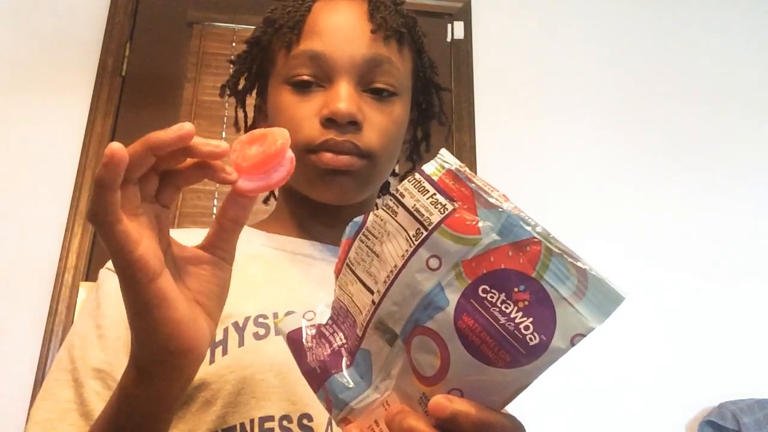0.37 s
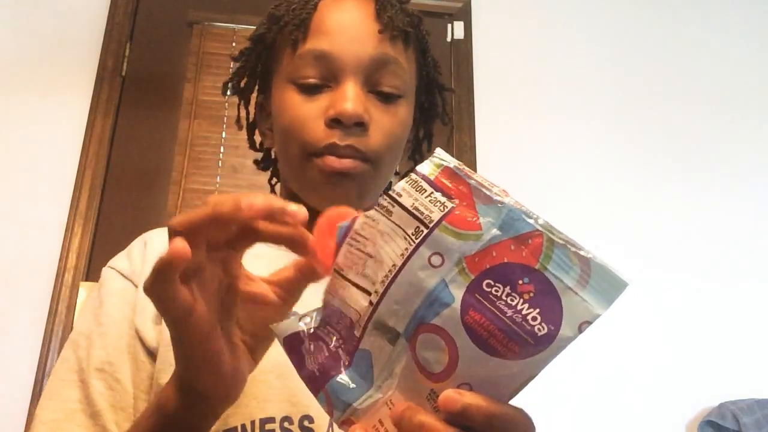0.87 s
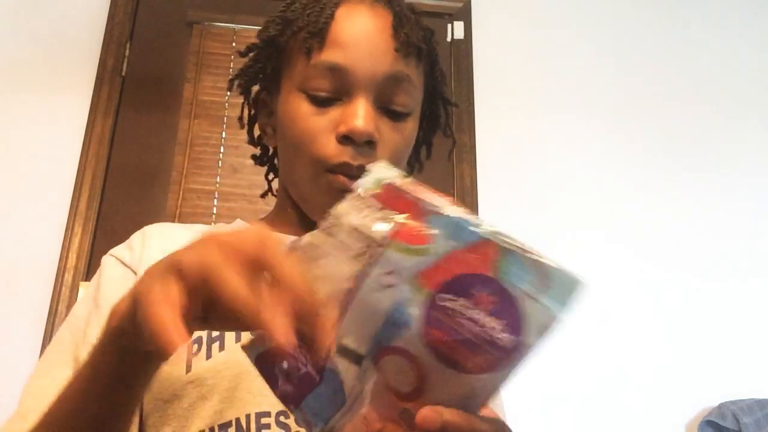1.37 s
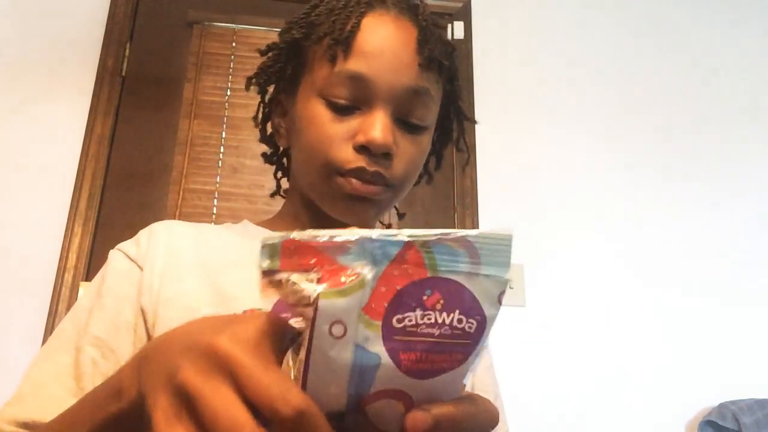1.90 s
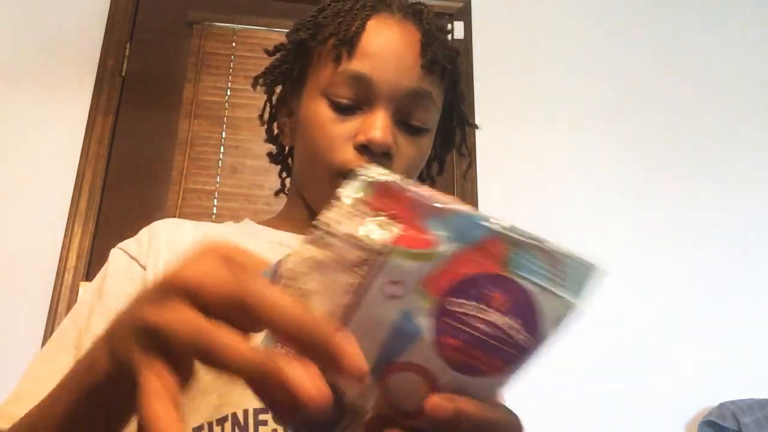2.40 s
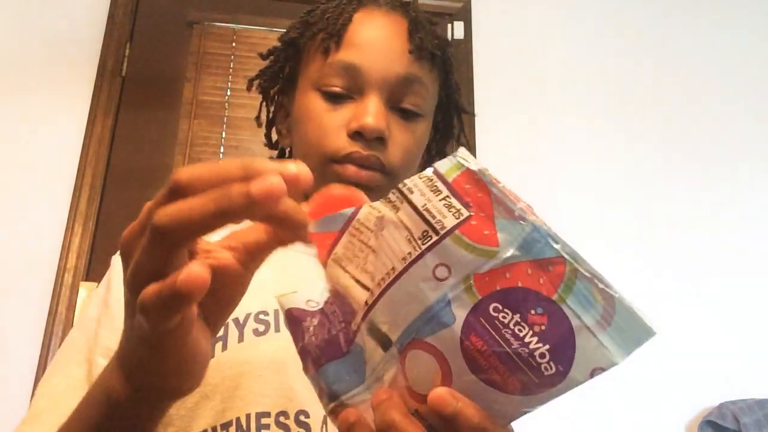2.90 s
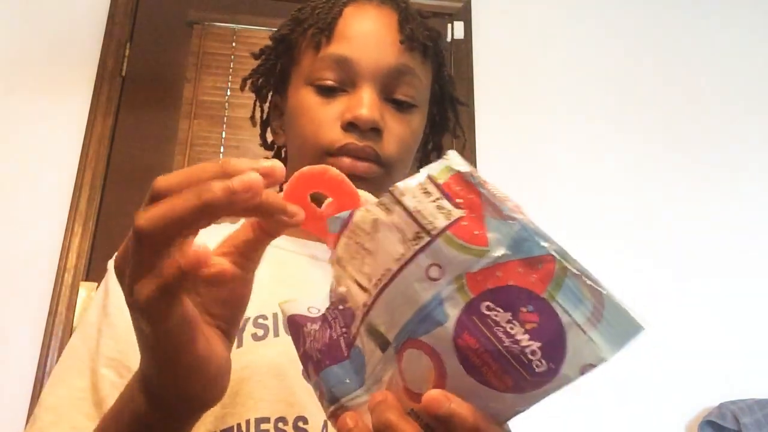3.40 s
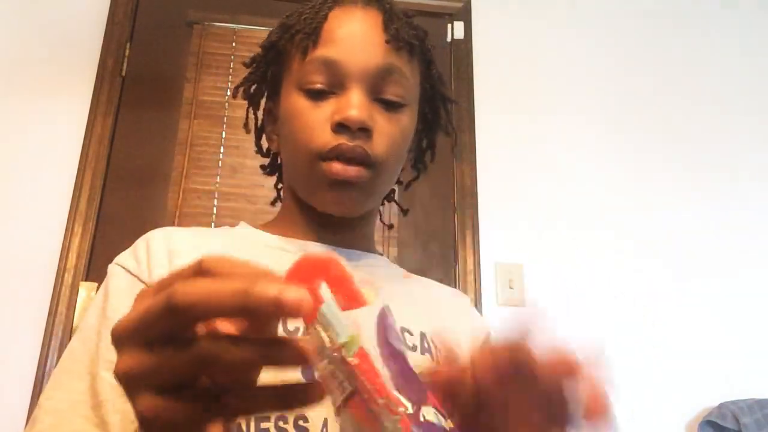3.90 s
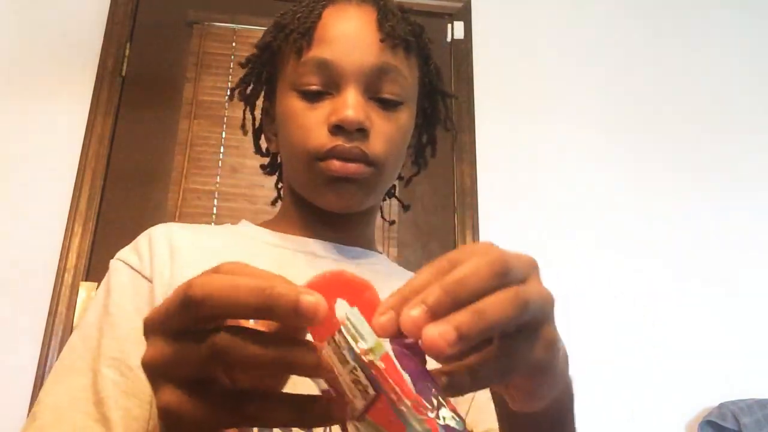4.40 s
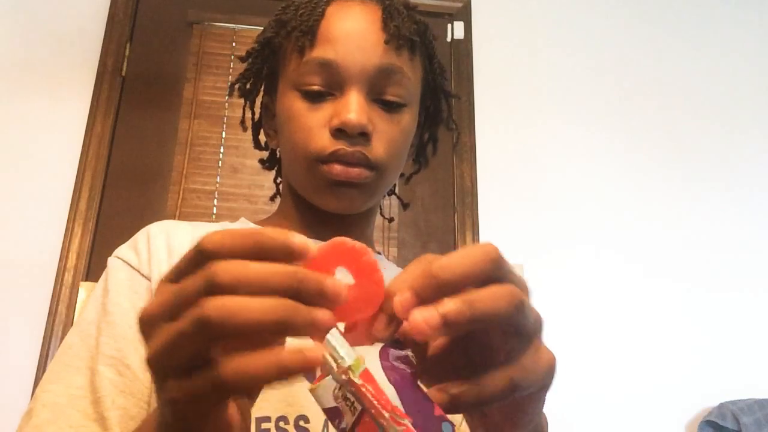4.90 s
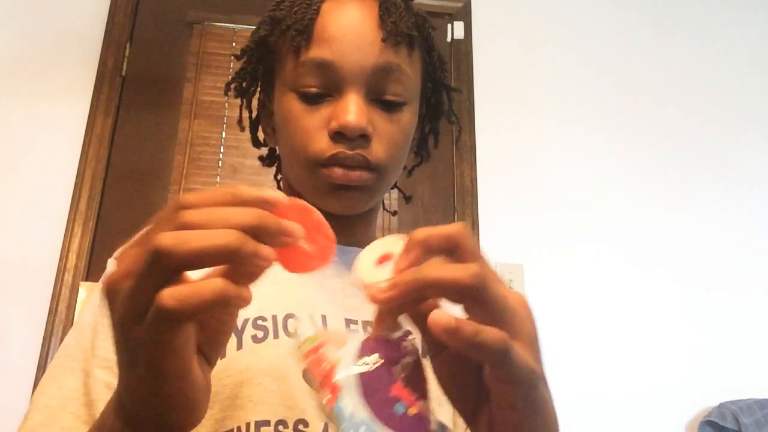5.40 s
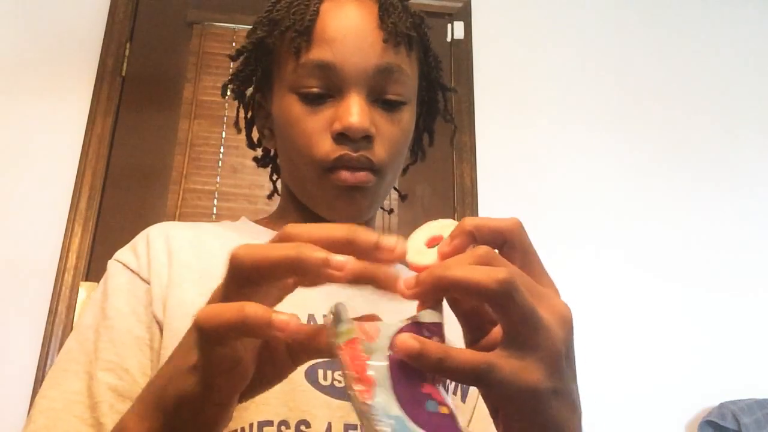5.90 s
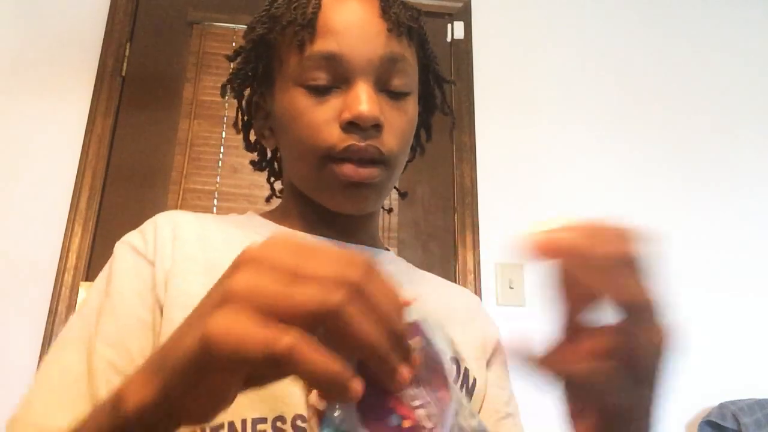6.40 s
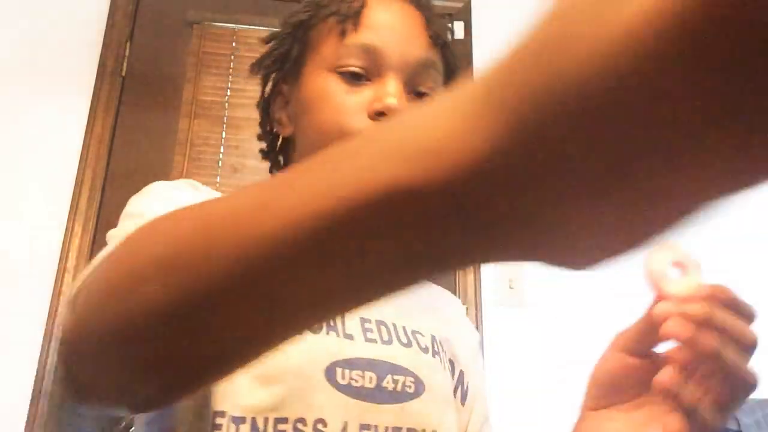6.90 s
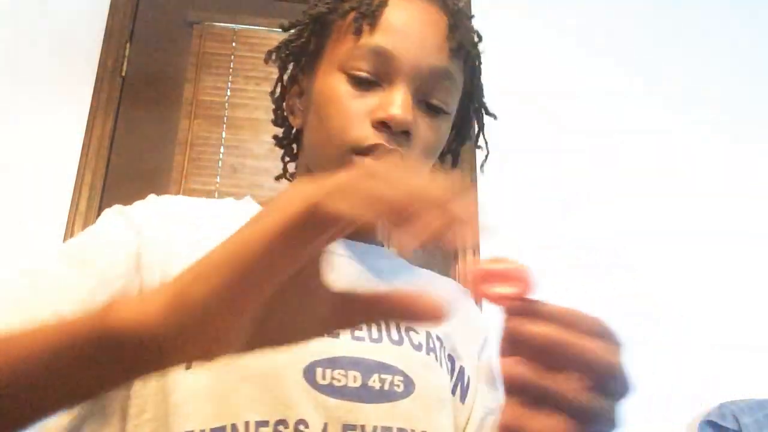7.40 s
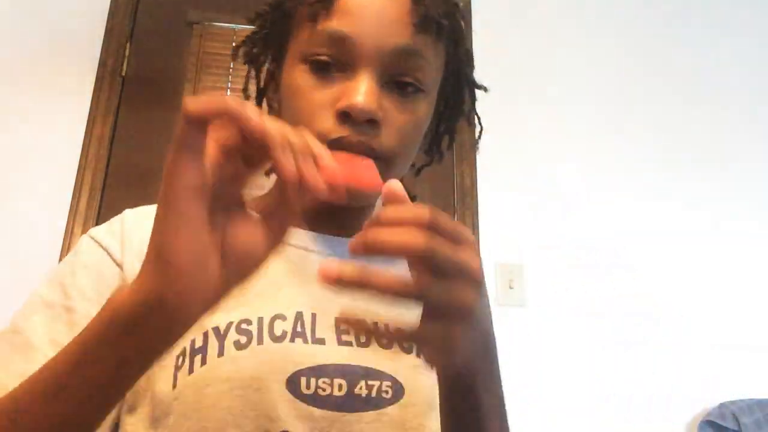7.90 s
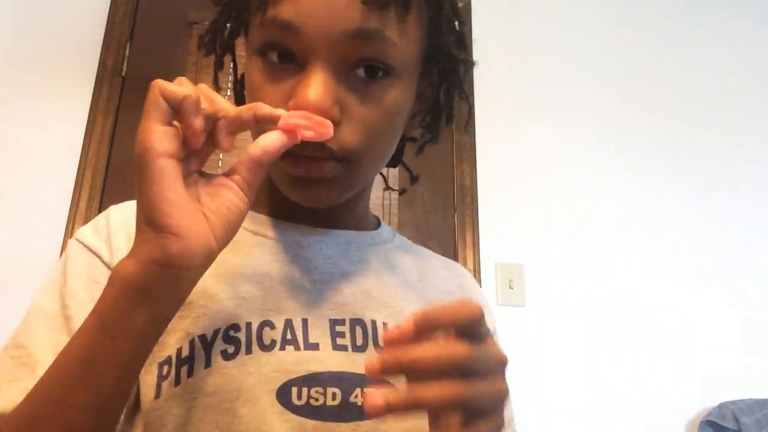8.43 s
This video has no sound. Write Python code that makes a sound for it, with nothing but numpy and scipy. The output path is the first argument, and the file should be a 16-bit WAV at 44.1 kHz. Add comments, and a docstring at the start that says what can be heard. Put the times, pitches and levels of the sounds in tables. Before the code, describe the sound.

Close to the microphone, fingers handle a stiff plastic candy pouch in a small quiet room. A few light ticks lead to dense crackling, a sparse lull, another sharp flurry, then scattered small crinkles. A final strong burst brings low thumps as the pouch is put aside, leaving only faint hum and hiss.

```python
"""A stiff plastic candy pouch is handled close to a microphone in a small quiet room.
Creases buckle with sharp snaps: noise bursts ring a freed facet and the film panels, with a bright tick.
Under them runs a dense crinkle: random clicks and rubbing noise excite the film's resonances.
The pouch's air and the table give low thumps, made of damped sines; echoes and a short tail form the room.
A low hum of resonant noise and a faint hiss of shaped noise fill the pauses."""
import sys
import numpy as np
from scipy import signal
from scipy.fft import rfft, irfft
from scipy.io import wavfile

SR = 44100
rng = np.random.default_rng(int(sys.argv[2]) if len(sys.argv) > 2 else 0)


def volts(x):
    """Linear amplitude factor 10**(x/20) for a level x in dB, scalar or array-like."""
    e = np.asarray(x, float) / 20
    return 10 ** e


def store_wav(level_fs):
    """Save 16-bit WAV to argv[1]."""
    pcm = np.round(np.clip(np.atleast_2d(level_fs), -1, 1) * 32767)
    wavfile.write(sys.argv[1], SR, pcm.T.astype(np.int16))


N = 376746


def rms_one(x):
    """Normalization: scale to an rms of 1."""
    return x / np.sqrt(np.mean(x ** 2) + 1e-20)


def band(x, low_hz, high_hz):
    """Band limiting: a Butterworth band-pass."""
    high_hz = min(high_hz, 0.45 * SR)
    return signal.sosfilt(signal.butter(2, [low_hz, high_hz], "band", fs=SR, output="sos"), x)


def ring(clicks, hz, t60):
    """Damped resonance: a unit click starts a decaying sine of height 1 in a two-pole filter."""
    radius, angle = volts(-60 / (t60 * SR)), 2 * np.pi * hz / SR
    return signal.lfilter([0, np.sin(angle)], [1, -2 * radius * np.cos(angle), radius ** 2], clicks + 1e-18)


def damped(hz, t60, size):
    """Free vibration: a sine starts at once and decays exponentially, by 60 dB in t60 seconds."""
    t = np.arange(size) / SR
    return np.sin(2 * np.pi * hz * t) * volts(-60 * t / t60)


def drift(rate_hz):
    """Slow random fluctuation: noise through a two-pole low-pass, scaled to rms 1."""
    r = np.exp(-2 * np.pi * rate_hz / SR)
    run_in = SR
    slow = signal.lfilter([1], [1, -2 * r, r * r], rng.standard_normal(N + run_in))
    return rms_one(slow[run_in:])


def add(out, start_s, sound):
    """Superposition: mix a short sound in at its start time."""
    i = round(start_s * SR)
    out[i:i + len(sound)] += sound[:N - i]


# spectrum of the hiss, relative level per Hz: pitch_hz, level_db
AIR_SPECTRUM = [(180, -23), (300, -4), (425, -9.5), (554, -9.5), (1170, -18.5), (1290, -21.5),
                (3010, -29.5), (11000, -35.5), (15800, -36.5)]


def air():
    """Stationary noise: a steady hiss, spectrally shaped, strongest in the low range and weak in the treble."""
    hz = np.maximum(np.fft.rfftfreq(N, 1 / SR), 1)
    point_hz, point_db = np.transpose(AIR_SPECTRUM)
    shape_db = np.interp(np.log(hz), np.log(point_hz), point_db)
    hiss = irfft(rfft(rng.standard_normal(N)) * volts(shape_db), N)
    return volts(-65) * rms_one(hiss)


# brief swells of the hum: peak_s, rise above the usual level_db
HUM_SWELLS = [(5.022, 16), (5.64, 6)]


def swelling():
    """Exponential growth and decay: level in dB of the swelling hum resonance, with a run-in of one second."""
    usual_db, rise_s, fall_s = -6.5, 0.03, 0.04  # time constants of each swell
    t = np.arange(N + SR) / SR - 1
    level_db = np.full(len(t), usual_db)
    for peak_s, swell_db in HUM_SWELLS:
        level_db += swell_db * np.exp(np.minimum((t - peak_s) / rise_s, (peak_s - t) / fall_s))
    return level_db


# resonances of the hum: pitch_hz, width_hz, level_db before drift and swelling
HUM_RESONANCES = [(51, 48, -63), (133.6, 47, -48.5), (202, 44, -62), (252.2, 30, -66.5), (319.5, 40, -69)]


def hum():
    """Resonant filtering: noise in a few low bands wavers slowly, and the second band swells."""
    out = np.zeros(N)
    for k, (hz, width_hz, level_db) in enumerate(HUM_RESONANCES):
        drive = rng.standard_normal(N + SR)
        if k == 1:
            drive *= volts(swelling())
        tone = band(drive, hz - width_hz / 2, hz + width_hz / 2)[SR:]
        tone *= np.sqrt(SR / 2 / width_hz)  # make up for the power lost outside the band
        out += volts(level_db + 1.3 * drift(1.6)) * tone
    return out


# reflections from near surfaces: delay_s, level_db
NEAR_ECHOES = [(.0058, -22), (.0115, -20)]
# bands of the diffuse tail: pitch_hz, t60_s, level_db relative to equal energy per Hz
ROOM_BANDS = [(300, .25, -6), (1200, .24, -8), (3500, .23, -8), (9000, .21, -9)]


def room(x):
    """Reverberation: convolution with near echoes and a diffuse tail that decays band by band."""
    t = np.arange(SR // 2) / SR
    answer = np.zeros(len(t))
    for hz, t60, level_db in ROOM_BANDS:
        noise = band(rng.standard_normal(len(t)), hz / 1.9, hz * 1.9)
        tail = noise * volts(-60 * t / t60) * (1 - np.exp(-t / 0.00063))
        equal_energy = np.sqrt(hz / SR / np.sum(tail ** 2))  # the same energy per Hz in every band
        answer += volts(level_db) * tail * equal_energy
    for delay_s, level_db in NEAR_ECHOES:
        answer[round(delay_s * SR)] += volts(level_db)
    return signal.fftconvolve(x, answer)[:N]


# low thumps: start_s, peak_db, pitch_hz, t60_s, deep shove_db relative to the ring
LOW_THUMPS = [(0.968, -40, 121, 0.1, -27), (1.06, -27, 171, 0.025, -7), (1.214, -31.5, 137, 0.047, -11),
              (1.882, -45, 162, 0.066, -24), (2.174, -38, 235, 0.11, -31), (2.395, -35, 115, 0.084, -21),
              (2.43, -25.5, 229, 0.031, -16), (2.589, -37, 140, 0.061, -14), (3.819, -44.5, 237, 0.16, 9),
              (3.932, -41, 137, 0.14, -19), (3.991, -25, 205, 0.056, -33), (6.02, -34.5, 182, 0.044, -26),
              (6.633, -26, 188, 0.023, -33), (6.853, -31, 149, 0.038, -22), (7.107, -20.5, 180, 0.046, -3),
              (7.175, -19.5, 185, 0.047, -7), (7.272, -34, 177, 0.057, -27)]


def thumps():
    """Damped low modes: squeezed air and the table answer with a soft ring and a deeper shove."""
    out, t = np.zeros(N), np.arange(SR // 3) / SR
    for start_s, peak_db, hz, t60, shove_db in LOW_THUMPS:
        sound = damped(hz, t60, len(t)) + volts(shove_db) * damped(74.0, 0.037, len(t))
        sound *= 1 - np.exp(-t / 0.003)  # soft onset
        add(out, start_s, volts(peak_db) * sound / np.abs(sound).max())
    return out


# the fingers squeeze the pouch: full_strength_s, hold_s, middle crinkle_db,
# brightness_db and weight_db (fine and large creases relative to the middle ones)
FINGER_SQUEEZES = [(0.092, 0.007, -50.5, 5, -2), (0.55, .005, -66, -5, -8), (0.896, 0.016, -58.5, -4.5, 6),
                   (0.98, .02, -56.5, 3.5, -15), (1.046, .08, -48.5, -3.5, 0), (1.175, 0.052, -47, -1.5, 1),
                   (1.351, 0.011, -43, -6, -3.5), (1.468, .012, -46.5, 1.5, -11),
                   (1.537, 0.0087, -39.5, -11, -4.5), (1.598, 0.074, -55.5, -6, -4),
                   (1.751, 0.0088, -43.5, -10, -7.5), (1.782, 0.0088, -47, -7, -12),
                   (1.89, 0.11, -40.5, -8.5, -1), (2.088, 0.014, -52.5, -2, -10),
                   (2.113, 0.0061, -39, -18, -22), (2.189, 0.0033, -39.5, -8.5, 0.5),
                   (2.358, .03, -52, -13, -3), (2.394, 0.06, -41.5, -9, -2), (2.483, 0.04, -43.5, -4.5, 1),
                   (2.594, .005, -51, -7, 9), (2.66, 0.0043, -54.5, 3.5, -10), (2.847, 0.18, -70.5, 2, 5),
                   (3.083, 0.0044, -56.5, 2.5, -0.5), (3.19, .005, -54, -13, -0.5),
                   (3.566, 0.0045, -59, -7, -3), (3.677, 0.0045, -53, -4.5, -2),
                   (3.733, 0.055, -50, -6.5, -5), (3.806, 0.034, -40.5, -2.5, 2.5),
                   (3.94, 0.019, -40, -7, -19), (3.99, 0.014, -39, -8, -4.5), (4.207, .02, -59.5, -2, -0.5),
                   (4.365, .015, -49, 1.5, -8.5), (4.499, 0.049, -56, 0, -3),
                   (4.552, 0.091, -47.5, -6, -10), (4.77, 0.019, -56.5, 0.5, 3.5),
                   (4.91, 0.0091, -70, 8, -11), (4.953, 0.026, -69.5, 16.5, -13),
                   (5.096, 0.017, -57.5, -5, 1), (5.138, 0.0092, -51, -10, -8), (5.238, 0.084, -63.5, 0, 6),
                   (5.334, 0.031, -46.5, -4.5, -4), (5.946, .005, -58, -17, -7),
                   (6.039, 0.071, -43.5, -11, -2), (6.282, .015, -48.5, -11, -9),
                   (6.395, 0.0079, -39, -7.5, -3.5), (6.616, .02, -49, -20, -6),
                   (6.64, 0.013, -38.5, -1.5, -2.5), (6.72, .03, -54, -27, 8),
                   (6.776, .012, -42, -11, -9.5), (6.863, 0.016, -44.5, -2.5, -13.5),
                   (6.937, 0.047, -46.5, -6, -10), (6.998, 0.04, -43, -5, 0.5),
                   (7.108, 0.014, -42.5, -5, 4), (7.153, 0.036, -47, -11.5, 3),
                   (7.266, .01, -59.5, 0, 10.5)]
# firmness of the hold between squeezes, as a faint crinkle: time_s, middle crinkle_db
GRIP_FIRMNESS = [(0, -69), (.3, -79), (.85, -86), (1.05, -62), (2.3, -57), (2.72, -65), (2.82, -62.5),
                 (3.06, -62), (3.28, -76), (3.55, -76), (4.1, -65), (5.08, -67), (5.3, -51.5),
                 (5.49, -75.5), (5.93, -77.5), (6.2, -61.5), (6.55, -60.5), (7.2, -47.5), (7.33, -79.5),
                 (7.5, -90), (8.54, -81)]


def handling():
    """Power addition: gains of middle, fine and large creases from the grip and every squeeze."""
    grip_s, grip_db = np.transpose(GRIP_FIRMNESS)
    grip_db = np.interp(np.arange(N) / SR, grip_s, grip_db)
    power = volts(grip_db + np.array([[0], [-8.5], [-2]])) ** 2
    # a squeeze comes on fast and lets go more slowly, quickest in the fine creases
    rise_db_per_s = 1001
    settle_db_per_s = 247.5 * np.array([[1], [1.24], [1]])
    for full_s, hold_s, level_db, bright_db, weight_db in FINGER_SQUEEZES:
        centre = round(full_s * SR)
        near = slice(max(centre - SR // 5, 0), centre + SR // 2)
        t = np.arange(N)[near] / SR - full_s
        rise_loss_db = rise_db_per_s * np.maximum(-t, 0)
        settle_loss_db = settle_db_per_s * np.maximum(t - hold_s, 0)
        peak_db = level_db + np.array([[0], [bright_db], [weight_db]])
        power[:, near] += volts(peak_db - rise_loss_db - settle_loss_db) ** 2
    return np.sqrt(power)


# resonances of the film panels: pitch_hz, ring_cycles (t60 in periods, before any stretch), relative level_db
FILM_PANELS = [(340, 1.04, 2.5), (570, 3.2, -4.5), (700, 3.6, -20.5), (1006, 6.1, -5), (1220, 1.5, 0.5),
               (1500, 1.8, 2.5), (1770, 4.2, 3), (2100, 12, -7.5), (2500, 6.3, 1), (3370, 8.6, -0.5),
               (3870, 12.6, -1), (5080, 8.9, 0)]
# resonances of fine bright creases: pitch_hz, ring_cycles (as above), relative level_db
FINE_CREASES = [(6250, 3.9, 2.5), (8200, 5.8, 1.5), (10800, 6., -7), (12200, 6., -8), (13800, 5., -8),
                (15500, 6., -13.5)]


def crinkle():
    """Random excitation of modes: creases flip in clumps, each ringing the resonances near its facet's pitch."""
    middle_gain, treble_gain, bass_gain = handling()
    median_flips_per_s, size_spread_db, rub_db = 2500.0, 5.5, -15.0
    flip_chance = median_flips_per_s * volts(5.0 * drift(40.0)) / SR
    born = np.flatnonzero(rng.random(N) < flip_chance)
    sizes = volts(size_spread_db * np.minimum(rng.exponential(1, len(born)), 3.5))
    facet_hz = 350 * 45 ** rng.random(len(born))
    shared_flicker_db = 1.8 * drift(30.0)
    groups = []
    for modes in (FILM_PANELS[:3], FILM_PANELS[3:], FINE_CREASES):
        out = np.zeros(N)
        for hz, cycles, level_db in modes:
            # film sliding on film: a smooth rustle
            rub_level_db = level_db + rub_db + shared_flicker_db + 5.2 * drift(22.0)
            clicks = volts(rub_level_db) * rng.standard_normal(N)
            octaves_apart = np.log2(hz / facet_hz)
            near = np.exp(-(octaves_apart / 0.27) ** 2)
            clicks[born] += sizes * near * volts(level_db) * rng.standard_normal(len(born))
            ringing = ring(clicks, hz, 1.65 * cycles / hz)
            out += band(ringing, hz / 2, hz * 2)  # a soft flip: no sharp edge far from the pitch
        groups.append(rms_one(out))
    bass, middle, treble = groups
    return middle_gain * middle + treble_gain * treble + bass_gain * bass


# buckling creases: start_s, body peak_db, facet pitch_hz, bright tick_db relative to the body
CREASE_SNAPS = [(0.073, -38.5, 2100, -5), (0.0863, -34.5, 2520, -4), (0.102, -34, 2280, -5),
                (0.1184, -29, 4920, 2.5), (0.5283, -26.5, 4300, -38), (0.8904, -39.5, 2410, -11),
                (0.914, -48, 8000, 2), (0.9803, -34, 2600, 3.5), (1.0364, -46, 2480, 13),
                (1.0496, -25.5, 2640, 9.5), (1.0943, -29.5, 1770, -20), (1.17, -44, 7500, 1),
                (1.1854, -20.5, 2260, -42), (1.2146, -23.5, 2570, 0.5), (1.3459, -25, 2110, -22),
                (1.3528, -29, 1890, -15), (1.4615, -20.5, 2500, -14), (1.535, -21, 1860, -22),
                (1.621, -32, 2400, -33.5), (1.6405, -25.5, 3450, -23), (1.6904, -34, 1130, -28),
                (1.7471, -24.5, 2480, -19), (1.7856, -16.5, 2340, -17), (1.836, -28, 2100, -20),
                (1.8755, -16.5, 1880, -41), (1.8904, -17.5, 1490, -29), (1.8976, -21.5, 2090, -20),
                (1.9222, -18, 1130, -5), (1.949, -13, 2170, -11.5), (1.9786, -18, 2020, -22),
                (1.9899, -19.5, 1070, 5), (2.0832, -32, 1500, -11), (2.1109, -19.5, 1680, -6.5),
                (2.1504, -28, 2180, -32), (2.1821, -12.5, 2200, -17), (2.2242, -29, 2470, -25),
                (2.2417, -29, 1740, -17), (2.2842, -23.5, 1990, -40), (2.393, -27, 2090, -29),
                (2.4032, -23.5, 2200, -26), (2.43, -16.5, 2160, -17), (2.445, -22, 4300, -7),
                (2.4652, -24, 2040, -11), (2.51, -25, 2100, -17), (2.595, -26.5, 1250, -38),
                (2.6542, -18.5, 2220, -12.5), (2.828, -31, 1640, -38), (2.8961, -31, 1790, -29),
                (2.984, -45, 2300, 5.5), (3.018, -41, 960, -16), (3.065, -36, 1740, -23),
                (3.082, -40.5, 3600, -15), (3.1617, -42.5, 991, -20), (3.1896, -31.5, 2340, -33),
                (3.335, -55, 6500, -5), (3.484, -48, 6500, -4), (3.5638, -43, 1036, -27),
                (3.6738, -42.5, 960, -2), (3.721, -32.5, 3720, -11), (3.7491, -24, 2040, -15),
                (3.7774, -27, 1030, -5.5), (3.801, -17, 2180, -27), (3.8239, -24.5, 1160, -2),
                (3.917, -30, 1770, -10), (3.9364, -14, 2200, -9), (3.981, -17.5, 2100, -46),
                (3.9868, -29, 1720, -30.5), (4.0057, -19.5, 1920, -23), (4.1721, -32.5, 1980, -25),
                (4.2276, -36, 3800, 0.5), (4.3088, -39, 3930, -19), (4.337, -40, 4000, -6),
                (4.372, -34, 3030, 0), (4.426, -36, 2160, -11), (4.5244, -32, 1240, -36),
                (4.5586, -27.5, 2250, -1.5), (4.615, -38, 2320, 1), (4.67, -39, 1270, -17),
                (4.7624, -33, 2150, -13), (4.948, -34, 5400, -3), (4.9815, -35, 6600, -17),
                (5.0983, -35.5, 1410, 0), (5.13, -20.5, 2230, -41), (5.227, -37.5, 1650, 3),
                (5.245, -33.5, 3200, -1), (5.2828, -29.5, 3100, -3), (5.3366, -26.5, 3440, -5),
                (5.3544, -26.5, 3240, -3.5), (5.3654, -27.5, 1300, 0), (5.9458, -35, 1060, -32),
                (6.031, -29.5, 1440, -35), (6.0461, -19, 1400, -12), (6.098, -18.5, 3700, -5.5),
                (6.1566, -24.5, 2940, -32), (6.271, -25, 2500, -20), (6.2796, -18.5, 2000, -24),
                (6.3959, -21, 1420, -15), (6.54, -37, 2200, -25), (6.5864, -33, 1960, -32),
                (6.6118, -21.5, 1030, -10), (6.6356, -19.5, 2350, -2), (6.6411, -15.5, 3000, -5),
                (6.6642, -15, 2320, -5), (6.7328, -21, 2370, -36), (6.7467, -23.5, 990, -40),
                (6.773, -16, 2180, -34), (6.785, -22.5, 1410, -27), (6.8697, -15, 1010, 3),
                (6.9344, -27.5, 1900, -20), (7.0668, -23, 1050, -14), (7.1117, -18, 1010, -11),
                (7.18, -12, 1560, 7), (7.1908, -19, 1500, -22), (7.223, -18.5, 2670, -8),
                (7.241, -26, 1110, -28), (7.2719, -26.5, 1410, -13), (7.3074, -50, 8450, -5),
                (7.322, -46.5, 7500, 3), (7.35, -60.5, 8980, -1.5), (7.36, -52, 9000, -1)]


def snaps():
    """Impulsive excitation: a tearing crease rings its facet and the panels, then settles in grainy crackle."""
    out, t, ring_size = np.zeros(N), np.arange(2600) / SR, 700
    tearing = (1 - np.exp(-t / 0.00023)) * (np.exp(-t / 0.0004) + 0.25 * np.exp(-t / 0.0027))
    tick_shape = (1 - np.exp(-t / 0.00017)) * np.exp(-t / 0.0011)
    for start_s, peak_db, hz, tick_db in CREASE_SNAPS:
        rough, bright, grains = rng.standard_normal((3, len(t)))
        settling = 0.026 * grains ** 2 * np.exp(-t / 0.013)  # uneven grains that thin out
        burst = rough * (tearing + settling)
        burst[8] += 2.5  # the moment the fold gives way
        body = damped(hz, 6.0 / hz, ring_size)  # dry, a few cycles
        for (mode_hz, cycles, level_db), strength in zip(FILM_PANELS[2:], grains[::-1]):
            near = np.exp(-np.log2(mode_hz / hz) ** 2)  # panels close to the facet's pitch answer most
            body += volts(level_db - 3.5) * near * strength * damped(mode_hz, cycles / mode_hz, ring_size)
        body[:6] += 0.25  # the crack itself, heard directly
        sound = signal.fftconvolve(burst, body)[:len(t)]
        tick = band(bright * (tick_shape + 0.32 * settling), 2600, 16000)
        snap = sound / np.abs(sound).max() + volts(tick_db) * tick / np.abs(tick).max()
        add(out, start_s, volts(peak_db) * snap)
    return out


def scene():
    """Superposition: the pouch, its room, and the background, in one channel."""
    pouch = crinkle() + snaps() + thumps()
    return (pouch + room(pouch) + hum() + air())[None]


def band_limit(x):
    """A steep low-pass at the top of the band."""
    return signal.sosfilt(signal.butter(12, 17050, fs=SR, output="sos"), x)


def record(dry):
    """Band limiting: the microphone drops the deepest bass and the extreme top."""
    x = signal.sosfilt(signal.butter(6, 42.0, "high", fs=SR, output="sos"), dry)
    x = signal.sosfilt(signal.cheby2(10, 60, 17000, fs=SR, output="sos"), x)
    return band_limit(x)


dry = scene()
out = record(dry)
store_wav(out)
```